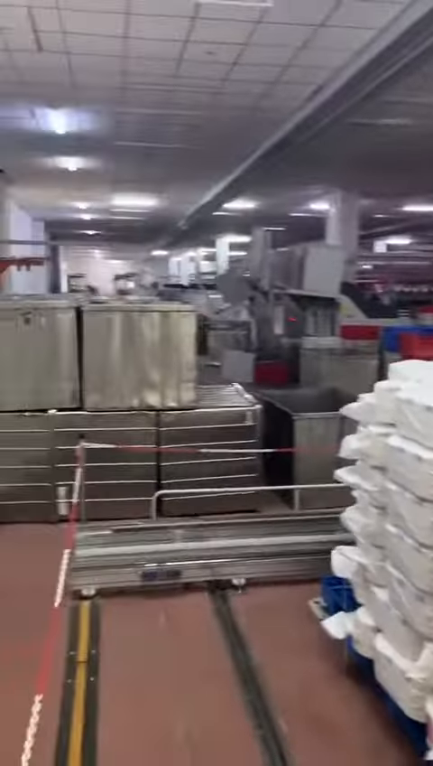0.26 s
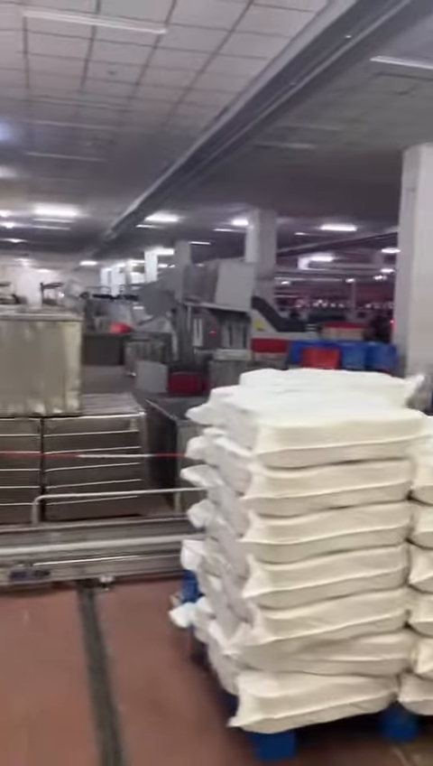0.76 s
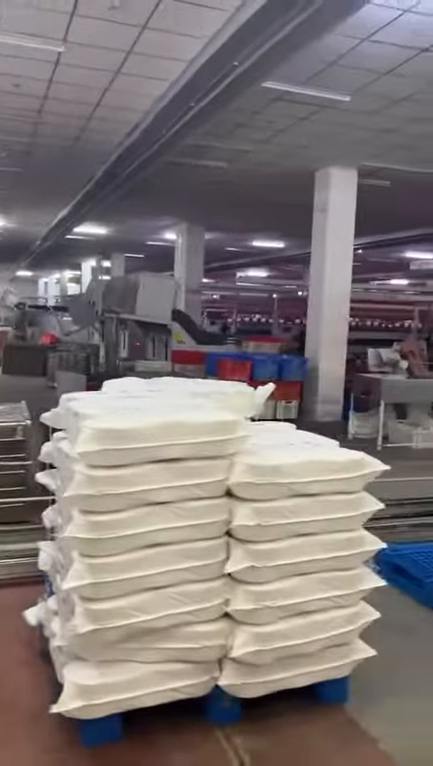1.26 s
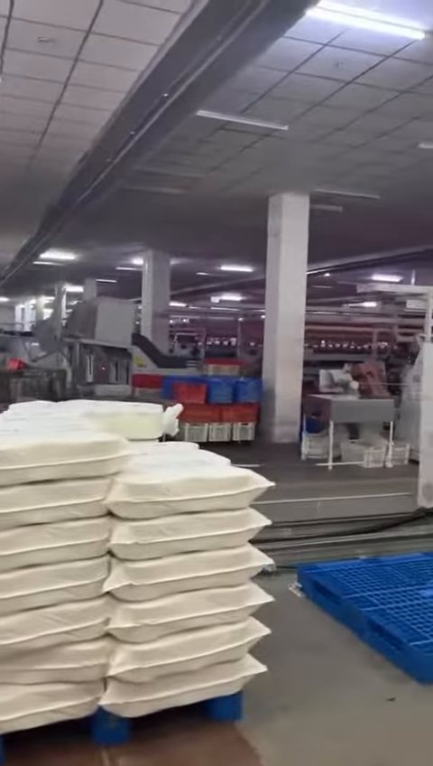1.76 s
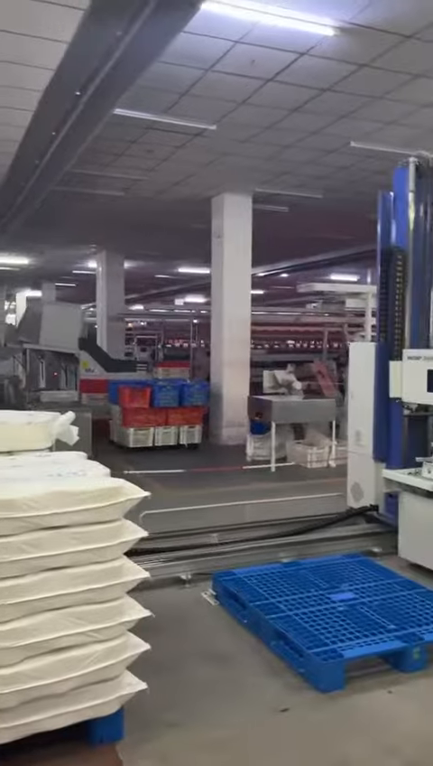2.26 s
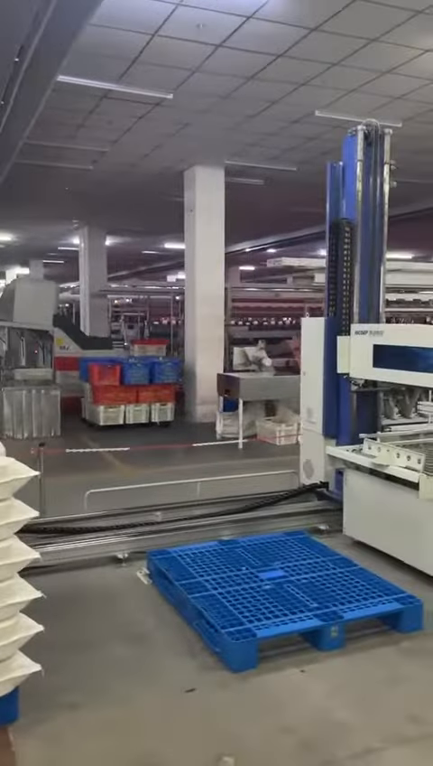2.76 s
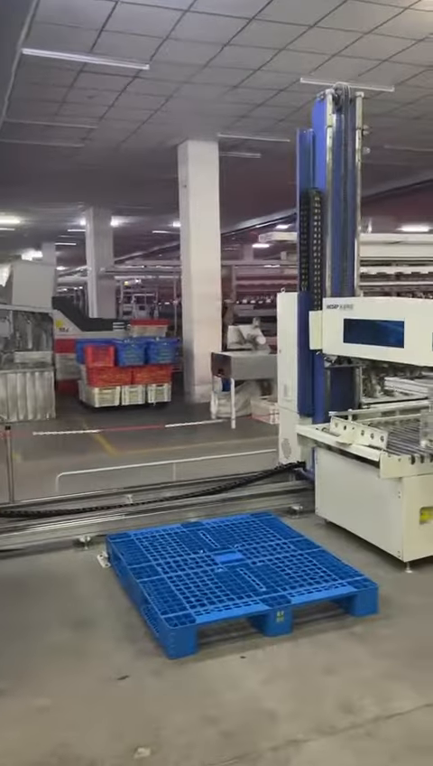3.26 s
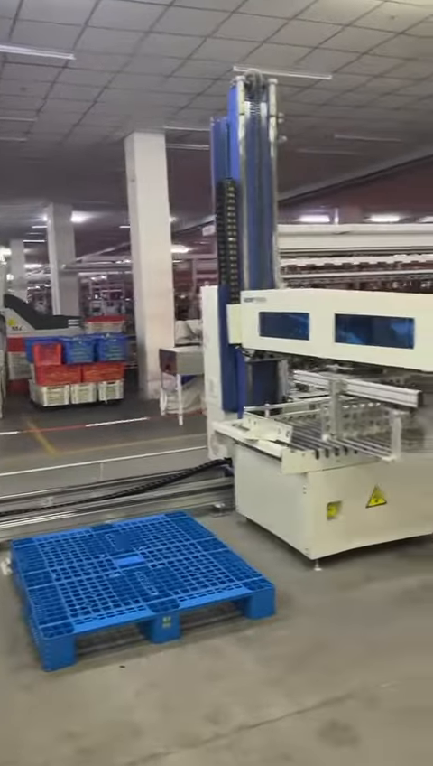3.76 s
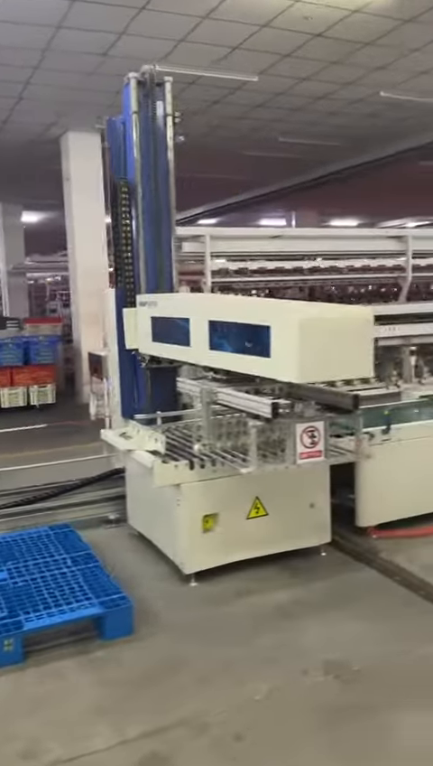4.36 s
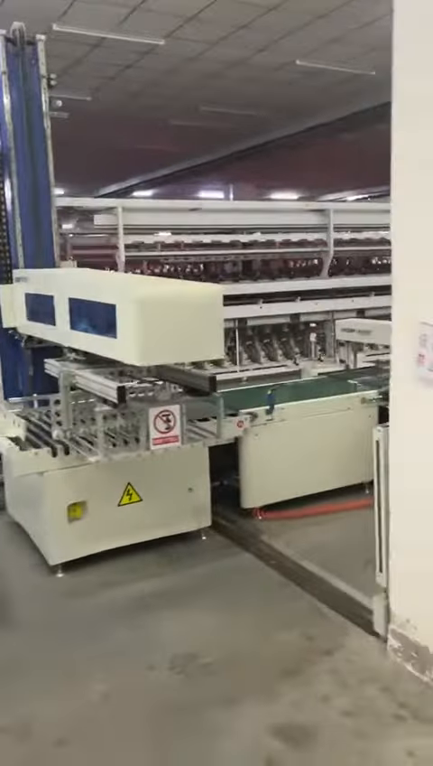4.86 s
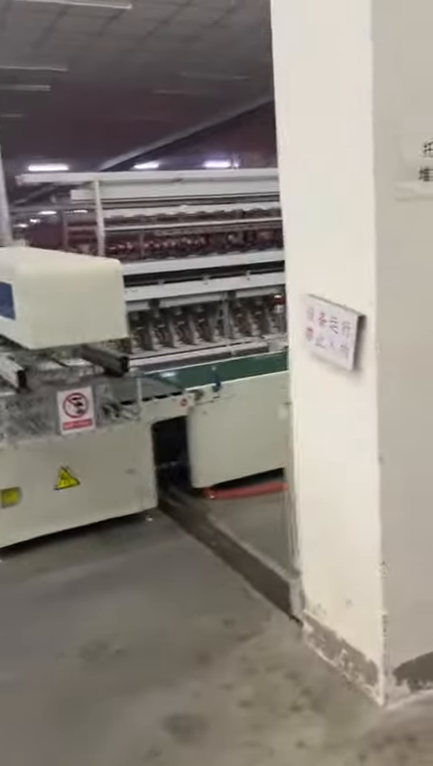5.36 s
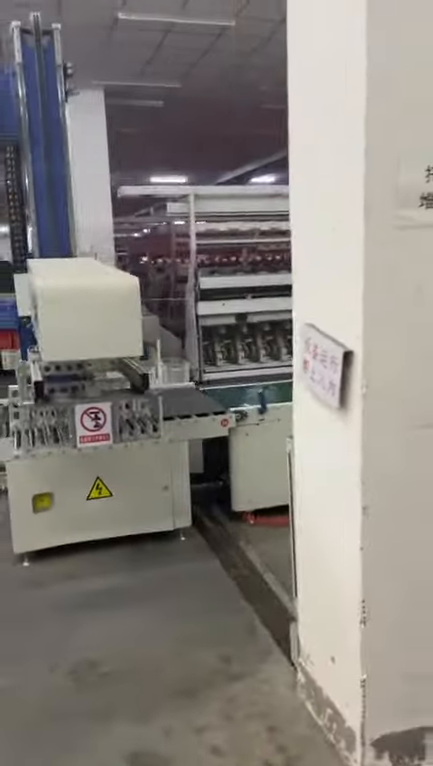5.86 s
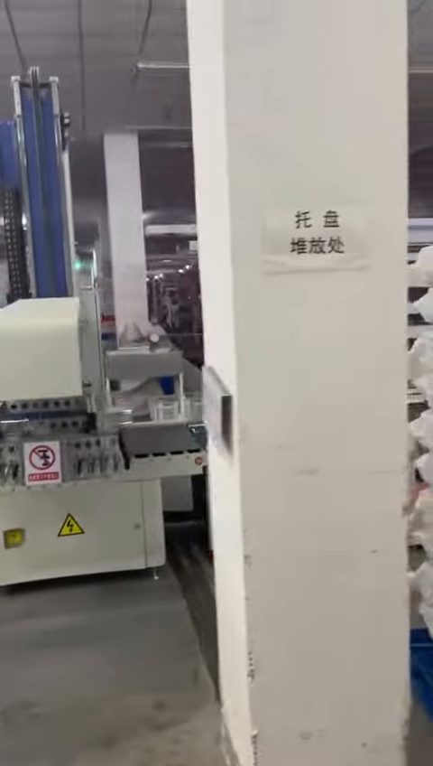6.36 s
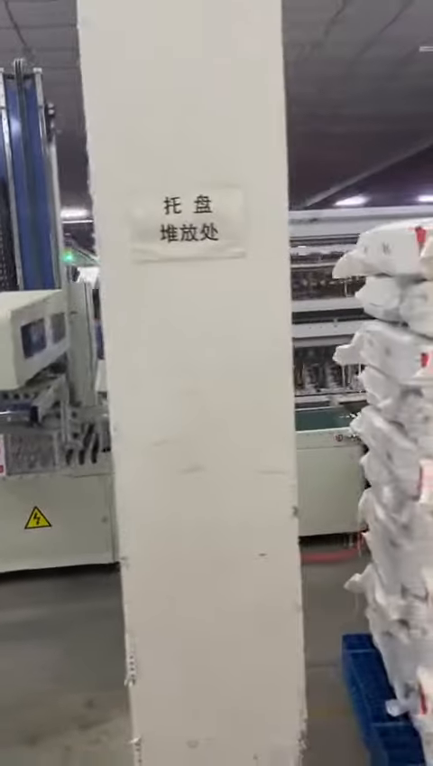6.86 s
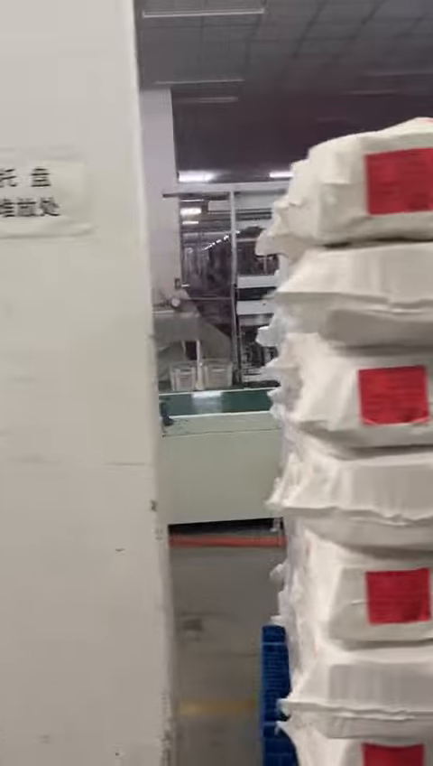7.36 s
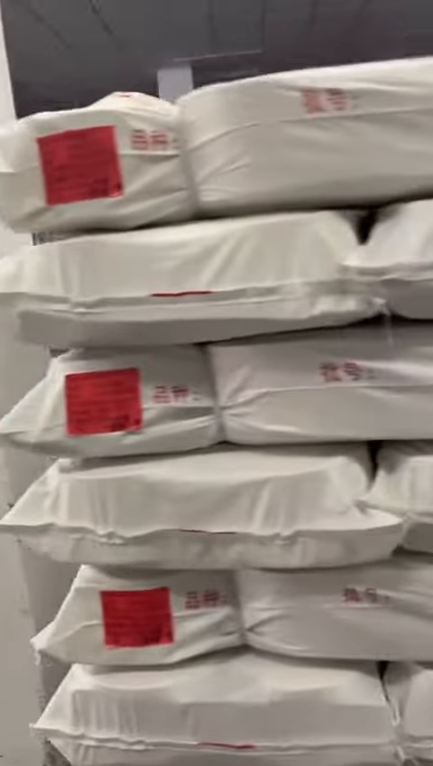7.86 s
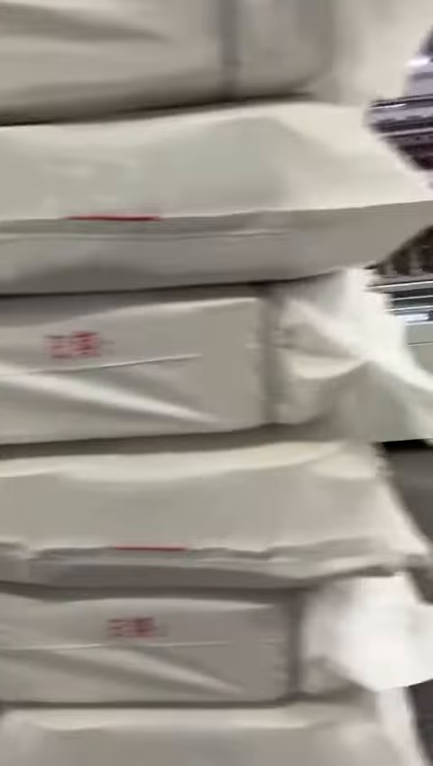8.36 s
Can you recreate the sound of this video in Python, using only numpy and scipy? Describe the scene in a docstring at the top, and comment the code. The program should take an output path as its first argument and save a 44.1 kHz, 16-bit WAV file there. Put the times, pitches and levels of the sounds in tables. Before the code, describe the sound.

In a large reverberant hall, wavering motor hums and distant machine din continue beneath occasional clattering strokes, low bumps and faint pneumatic hisses.

```python
"""Motors hum over the roar of many distant machines and a hiss of running yarn and air in a factory hall.
About every four seconds a mechanism clanks and later clatters back, with small rattles, bumps and puffs between.
Hums are wandering sines frayed by narrow noise; the din is coloured noise; strokes are noise bursts through
resonances; bumps are short sines. The hall smears strokes, bumps and puffs; a walker's phone hears it all."""
import sys
import numpy as np
from scipy import signal
from scipy.fft import rfft, irfft, next_fast_len
from scipy.io import wavfile
from scipy.ndimage import uniform_filter1d, map_coordinates

SR = 44100
rng = np.random.default_rng(int(sys.argv[2]) if len(sys.argv) > 2 else 0)


def unload_audio(sound):
    """Save the sound as a 16-bit wav file, at the path given as the first command line argument."""
    columns = np.transpose(np.atleast_2d(sound))
    # keep every value between -1 and 1, then stretch to whole-number steps
    steps = np.round(np.clip(columns, -1, 1) * 32767)
    wavfile.write(sys.argv[1], SR, steps.astype(np.int16))


N = 380007
TIME = np.arange(N) / SR


def amp(db):
    """Decibels to gain."""
    return 10 ** (np.asarray(db) / 20)


def unit(x):
    """Scale to rms 1."""
    return x / np.sqrt(np.mean(x ** 2) + 1e-20)


def along(points, hz):
    """(frequency, value) points read on a log frequency axis."""
    f, v = np.transpose(points)
    return np.interp(np.log(hz + 1), np.log(f + 1), v)


def curves(rows):
    """One value per sample for each column after the time."""
    s, *columns = np.transpose(rows)
    return [np.interp(TIME, s, column) for column in columns]


def wobble(rate):
    """A smooth random curve through normal draws, rate knots a second."""
    knots = rng.standard_normal(int(N * rate / SR) + 4)
    coarse = TIME[::100]
    return np.interp(TIME, coarse, map_coordinates(knots, [coarse * rate]))


def filtered(x, response):
    """x times a response of frequency, padded so the end does not wrap round."""
    m = next_fast_len(N + SR // 2)
    return irfft(rfft(x, m) * response(np.fft.rfftfreq(m, 1 / SR)), m)[:N]


def noise(gain, size):
    """Noise of rms 1 coloured by a gain of frequency."""
    spectrum = rfft(rng.standard_normal(size)) * gain(np.fft.rfftfreq(size, 1 / SR))
    return unit(irfft(spectrum, size))


def resonance(hz, centre_hz, width_hz):
    """Gain of one resonance; squared by a caller, it is narrower than width_hz."""
    return hz * width_hz / np.hypot(centre_hz ** 2 - hz ** 2, hz * width_hz)


def tone(hz, wander_hz, rate):
    """A sine of rms 1 whose pitch wanders."""
    pitch = hz + wander_hz * wobble(rate)
    return np.sqrt(2) * np.sin(2 * np.pi * np.cumsum(pitch) / SR)


def burst(t, length, rise, fall):
    """Envelope that builds up, holds until length and dies away (all s; rise and fall to 1/e)."""
    return (1 - np.exp(-t / rise)) * np.exp(-np.maximum(t - length, 0) / fall)


def add(track, s, x):
    """Mix x into the track from time s."""
    part = track[max(round(s * SR), 0):][:len(x)]
    part += x[:len(part)]


def shaft():
    """A slow shaft drones as a wandering low sine, strongest early in the walk."""
    # drone along the walk: (time [s], level [dB])
    drone = [(0, -33), (.15, -26), (.75, -27), (1.02, -37), (1.25, -23), (1.5, -30), (2.12, -31),
             (2.27, -47), (3.6, -43), (5, -33.5), (6.3, -38), (7, -38), (8.62, -43)]
    flutter_db = 2.5
    level_db, = curves(drone)
    return amp(level_db + flutter_db * wobble(5.8)) * tone(50.2, wander_hz=1.02, rate=9)


def fan():
    """A fan hums, swelling and sinking along the walk; turbulence frays its tone with narrow noise."""
    # hum along the walk, before the trim: (time [s], level [dB])
    swells = [(0.1, -41), (1.1, -32.5), (1.5, -38.5), (2.15, -29.5), (2.45, -42.5), (2.7, -32), (3.2, -51),
              (3.75, -34.5), (4.4, -51), (4.75, -31.5), (5.0, -40), (5.35, -35), (6.3, -32), (7.05, -42),
              (7.8, -30), (8.6, -34.5)]
    fan_hz, wander_hz = 347, 1.97
    trim_db, flutter_db = -0.2, 1.5
    fray_db, fray_width_hz = -7.5, 25
    level_db, = curves(swells)
    fray = noise(lambda hz: resonance(hz, fan_hz, fray_width_hz) ** 2, N)
    hum = tone(fan_hz, wander_hz, rate=12) + amp(fray_db) * fray
    return amp(level_db + trim_db + flutter_db * wobble(9)) * hum


def blurred(centre_hz, width_hz):
    """A whine blurred into narrow noise of rms 1 around its pitch."""
    return noise(lambda hz: resonance(hz, centre_hz, width_hz) ** 2, next_fast_len(N))[:N]


def motors():
    """Two frayed hums swell and fade as the walker crosses standing waves; far whines are narrow noise."""
    # two smaller motors: (pitch [Hz], wander [Hz])
    tones = [(193.7, 1.2), (387.8, 1.14)]
    # their hums along the walk, before the trim: (time [s], lower hum level [dB], higher hum level [dB])
    standing_waves = [(0.1, -39, -39.5), (1.0, -35.5, -45), (1.45, -39.5, -38), (2.1, -40, -47),
                      (2.9, -36.5, -49), (3.5, -35, -43.5), (4.2, -36, -38), (4.7, -31, -47),
                      (5.1, -38, -33.5), (5.85, -37, -47), (6.5, -44, -35.5), (7.2, -45, -41),
                      (8.6, -45, -41)]
    # faint whines of farther machines, before the trim: (pitch [Hz], level [dB])
    far_whines = [(116, -40), (229, -43), (443, -50.5), (556, -54), (600, -57), (648, -53), (775, -52.5),
                  (1351, -66), (1561, -59), (3639, -67)]
    hum_trim_db, whine_trim_db = -1.1, -1.0
    flutter_db = 1  # chance fading on top of the standing waves
    fray_db, fray_width_hz, whine_width_hz = -5, 24, 10
    out = np.zeros(N)
    for (hz, wander_hz), level_db in zip(tones, curves(standing_waves)):
        gain = amp(level_db + hum_trim_db + flutter_db * wobble(6))
        hum = tone(hz, wander_hz, rate=9) + amp(fray_db) * blurred(hz, fray_width_hz)
        out += gain * hum
    for hz, level_db in far_whines:
        out += amp(level_db + whine_trim_db) * blurred(hz, whine_width_hz)
    return out


def smoothed_field(shape, bins, frames):
    """Random field of rms 1, smoothed over frequency bins and time frames."""
    field = uniform_filter1d(rng.standard_normal(shape), size=bins, axis=0)
    return unit(uniform_filter1d(field, size=frames, axis=1))


def rush(spectrum, patchy_db):
    """Noise of rms 1 with drifting patches of random gain and a finer, quicker grain."""
    # fine grain, roughest in the low treble: (frequency [Hz], depth [dB])
    grain_depth = [(500, .5), (2000, .8), (3000, 2.6), (4200, 1.4), (6000, .5)]
    hz, _, z = signal.stft(rng.standard_normal(N), SR, nperseg=1024)
    patches = patchy_db * smoothed_field(z.shape, bins=7, frames=9)
    grain = along(grain_depth, hz)[:, None] * smoothed_field(z.shape, bins=2, frames=6)
    x = signal.istft(z * amp(patches + grain), SR, nperseg=1024)[1][:N]
    return unit(filtered(x, lambda hz: amp(along(spectrum, hz))))


def din():
    """Many distant machines merge into rumble, roar and hiss; the first two swell slightly and slowly grow."""
    # relative spectrum of the low rumble: (frequency [Hz], density [dB per Hz])
    rumble_spectrum = [(12, -8), (28, -17.5), (55, 1), (70, 0), (110, -2), (145, -5), (185, -4.5),
                       (260, -17.5), (600, -57)]
    # relative spectrum of the roar: (frequency [Hz], density [dB per Hz])
    roar_spectrum = [(120, -30.5), (190, -2.5), (232, 1), (280, -3.5), (320, 0.5), (365, -3.5), (420, -6.5),
                     (520, -8), (700, -13.5), (1150, -17.5), (1500, -19.5), (2100, -20.5), (2900, -30.5),
                     (6000, -36.5)]
    # relative spectrum of the yarn and air hiss: (frequency [Hz], density [dB per Hz])
    hiss_spectrum = [(1000, -28), (2500, -16), (2950, -9), (3600, 1), (4300, 1), (5000, 2.5), (6600, -3),
                     (7700, 3), (9300, -2), (11000, -3), (12200, -0.5), (13500, -7.5), (14300, -12)]
    rumble_db, roar_db, hiss_db = -29, -30, -40.5
    rumble_swell_db, roar_swell_db = 1, 0.26
    rise_db_per_s = 0.14  # on the way toward the line
    approach_db = rise_db_per_s * (TIME - TIME.mean())
    rumble_gain = amp(rumble_db + approach_db + rumble_swell_db * wobble(7.1))
    roar_gain = amp(roar_db + approach_db + roar_swell_db * wobble(3.16))
    rumble = rumble_gain * rush(rumble_spectrum, patchy_db=0.0)
    roar = roar_gain * rush(roar_spectrum, patchy_db=0.9)
    hiss = amp(hiss_db) * rush(hiss_spectrum, patchy_db=1.2)
    return rumble + roar + hiss


def hall(x):
    """A sound and the hall's long tail, drawn afresh each call; lows ring longest, high treble dies first."""
    # reverberation: (frequency [Hz], time to fall 60 dB [s])
    decay = [(100, 3.1), (1400, 1.17), (4000, 1.2), (12000, 0.49)]
    direct_db, tail_db = -0.5, -2
    hz, t, z = signal.stft(rng.standard_normal(3 * SR // 2), SR, nperseg=256)
    fade = amp(-60 * t / along(decay, hz)[:, None])
    tail = signal.istft(z * fade, SR, nperseg=256)[1]
    out = amp(tail_db) * signal.fftconvolve(x, tail / np.linalg.norm(tail))
    add(out, 0, amp(direct_db) * x)
    return out[:N]


def mechanism():
    """Each stroke is a dense run of contacts that rings the steel frame, a cover plate and a small linkage."""
    # strokes, levels before the hall: (time [s], level [dB], frame ring [dB], plate ring [dB],
    # rattle length [s], build-up [s], linkage ring [Hz], linkage ring [dB]); rings relative to the stroke
    strokes = [(0.15, -35.5, -8, -4.5, 0.085, 0.017, 3400, -15),
               (0.57, -34, -14, -14, 0.049, 0.02, 1740, -5),
               (0.972, -36.5, -14, -16, 0.025, 0.0098, 3320, -11),
               (2.43, -35, -16, -14, .07, 0.028, 2500, -18),
               (2.508, -31, -13, -10, 0.12, 0.025, 3460, -12.5),
               (3.721, -36, -20, -20, 0.029, .012, 2760, -8),
               (4.185, -35.5, -1, -9, 0.12, 0.011, 3300, -11),
               (4.686, -38.5, -15, -15, 0.028, .012, 2950, -16),
               (6.57, -29.5, -14, -10, 0.12, 0.011, 3600, -11.5),
               (6.95, -44, -19, -19, 0.056, .012, 3500, -18),
               (7.838, -36, -20, -20, 0.061, 0.011, 3370, -14),
               (8.36, -31.5, -7, 0.5, 0.046, 0.007, 3250, -5.5)]
    # steel frame modes: (pitch [Hz], width before squaring [Hz], level [dB])
    frame_modes = [(1290, 130, 2), (1540, 160, -1), (1910, 220, -10)]
    # linkage modes: (ratio to its main ring, level [dB])
    link_modes = [(.76, -4.5), (1, 2.5), (1.08, -24), (1.34, -8)]
    # relative spectrum of loose parts clattering: (frequency [Hz], density [dB per Hz])
    clatter_spectrum = [(100, -18), (350, 18), (600, 6.5), (950, 9), (1400, 3), (2000, 3.5), (2600, -1),
                        (2980, -1.5), (3400, -3.5), (4300, -3.5), (5100, -4), (7000, -6.5), (13000, -21)]
    plate_hz, plate_width_hz, link_width_hz = 1393, 230, 340
    scatter_db = 2  # unevenness of the contacts within a stroke
    # the linkage stops almost with the contacts; the plate rings longest
    rattle_fall_s, link_fall_s, frame_fall_s, plate_fall_s = 0.059, 0.017, 0.05, 0.13

    def frame_gain(hz):
        return sum(amp(db) * resonance(hz, centre, width) ** 2 for centre, width, db in frame_modes)

    def link_gain(hz, main_hz):
        return sum(amp(db) * resonance(hz, ratio * main_hz, link_width_hz) ** 2 for ratio, db in link_modes)

    out, t = np.zeros(N), np.arange(SR) / SR
    for s, level_db, frame_db, plate_db, length, rise, link_hz, link_db in strokes:
        contacts = unit(amp(scatter_db * noise(lambda hz: hz < 70, len(t))))
        clatter = contacts * noise(lambda hz: amp(along(clatter_spectrum, hz)), len(t))
        link = contacts * noise(lambda hz: link_gain(hz, link_hz), len(t))
        frame = noise(frame_gain, len(t))
        plate = noise(lambda hz: resonance(hz, plate_hz, plate_width_hz) ** 2, len(t))
        stroke = burst(t, length, rise, rattle_fall_s) * clatter
        stroke += amp(link_db) * burst(t, length, rise, link_fall_s) * link
        stroke += amp(frame_db) * burst(t, length, rise, frame_fall_s) * frame
        stroke += amp(plate_db) * burst(t, length, rise, plate_fall_s) * plate
        add(out, s, hall(amp(level_db) * stroke))
    return out


def air():
    """Valves let off soft puffs: a broad jet of noise, each with a breathy whistle of narrower noise."""
    # puffs, before the hall: (time [s], length [s], level [dB], whistle pitch [Hz],
    # whistle level relative to the jet [dB])
    puffs = [(0.582, 0.062, -51, 4530, 4.5), (1.263, 0.17, -44.5, 7500, -4), (1.301, 0.11, -54, 4900, 4),
             (1.696, 0.15, -47, 7500, -4), (3.398, .17, -47.5, 7050, -2), (3.571, 0.17, -42.5, 7750, -7),
             (4.181, 0.26, -47, 8000, -4), (4.602, 0.32, -48, 7500, -7), (6.948, 0.13, -45.5, 4560, -3),
             (7.18, 0.11, -57, 4850, 10), (7.527, 0.17, -51, 7740, -2), (7.849, 0.2, -44, 7600, -10)]
    out, t = np.zeros(N), np.arange(SR) / SR
    for s, length, level_db, whistle_hz, whistle_db in puffs:
        jet = noise(lambda hz: resonance(hz, centre_hz=8500, width_hz=10000), len(t))
        whistle = noise(lambda hz: resonance(hz, whistle_hz, width_hz=520) ** 2, len(t))
        puff = jet + amp(whistle_db) * whistle
        add(out, s, amp(level_db) * burst(t, length, rise=0.0067, fall=0.04) * puff)
    return out


def bumps():
    """A heavy part settles with a brief low knock, a quickly dying sine."""
    # dull knocks, before the trim and the hall: (time [s], level [dB], pitch [Hz])
    knocks = [(0.598, -31, 110), (2.114, -22.5, 97), (2.561, -18, 118)]
    trim_db = -1.0
    out, t = np.zeros(N), np.arange(SR // 2) / SR
    for s, level_db, hz in knocks:
        envelope = burst(t, length=0.0037, rise=0.0024, fall=0.026)
        add(out, s, amp(level_db + trim_db) * envelope * np.sin(2 * np.pi * hz * t))
    return out


def scene():
    """The line's strokes, bumps and puffs sound through the hall, over the hums and din."""
    hums = shaft() + fan() + motors()
    line = mechanism() + hall(air() + bumps())  # mechanism() sends each stroke through the hall itself
    return (hums + din() + line)[None]


def record(dry):
    """The phone has two deep notches in the treble and a band limit."""
    # dead bands of the phone: (centre [Hz], half width to 1/e of the dip [Hz])
    dead_bands = [(6000, 406), (10270, 590)]
    top_hz = 14280

    def response(hz):
        dips = [1 - np.exp(-((hz - centre) / width) ** 2) for centre, width in dead_bands]
        return np.prod(dips, axis=0) * (hz < top_hz)

    return filtered(dry[0], response)[None]


dry = scene()
out = record(dry)
unload_audio(out)
```